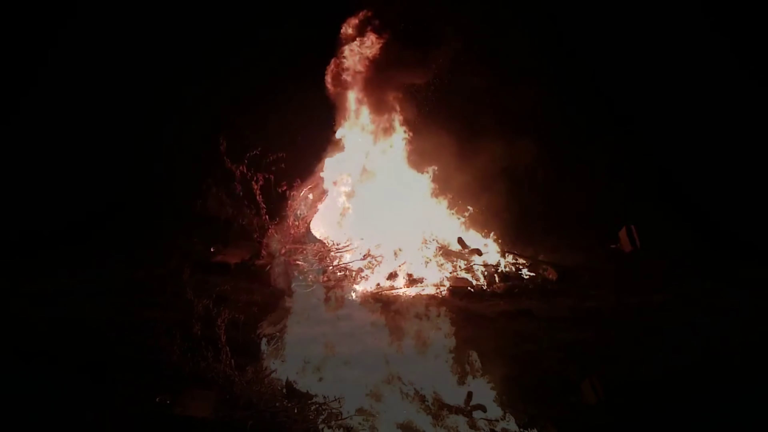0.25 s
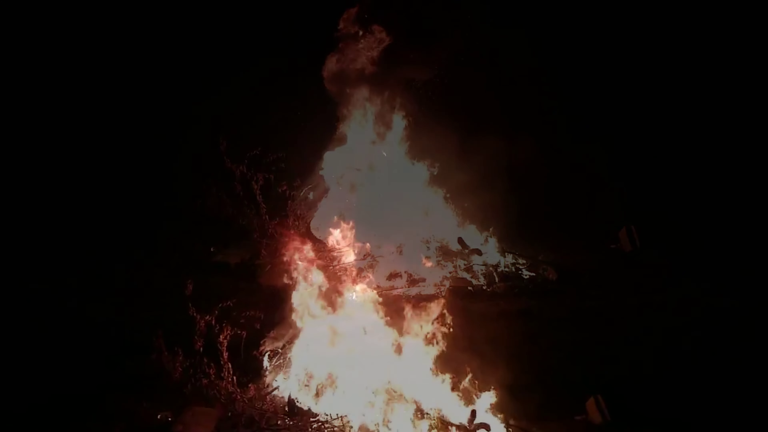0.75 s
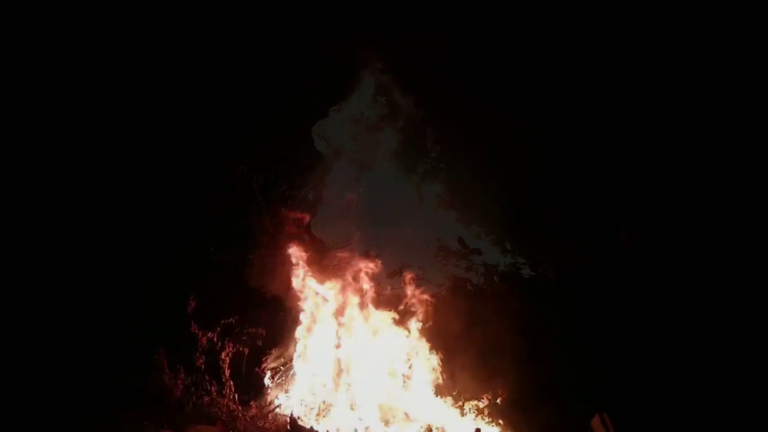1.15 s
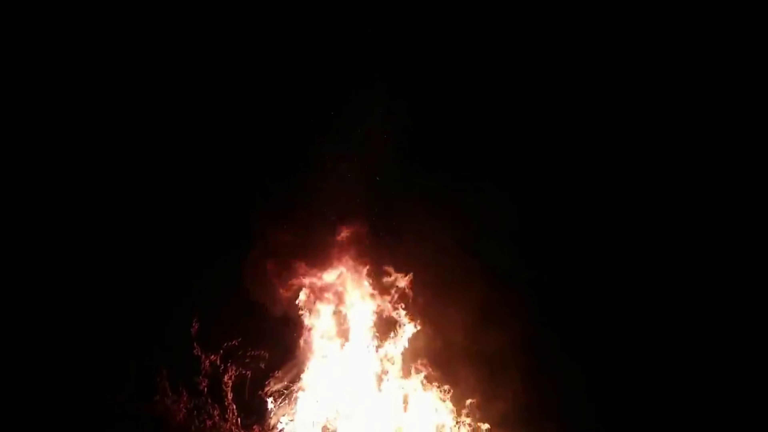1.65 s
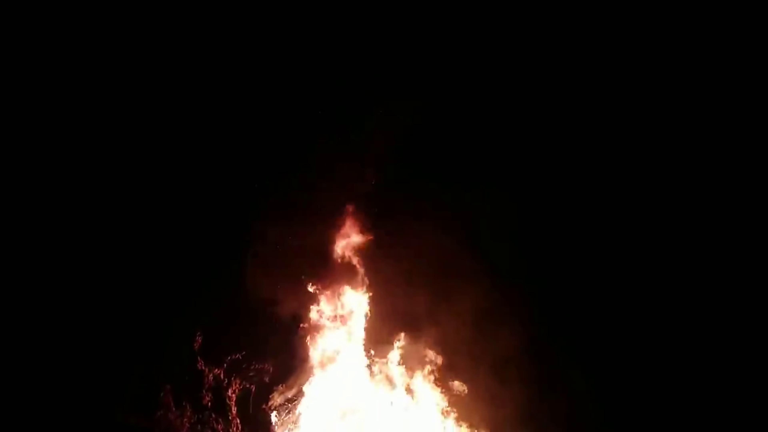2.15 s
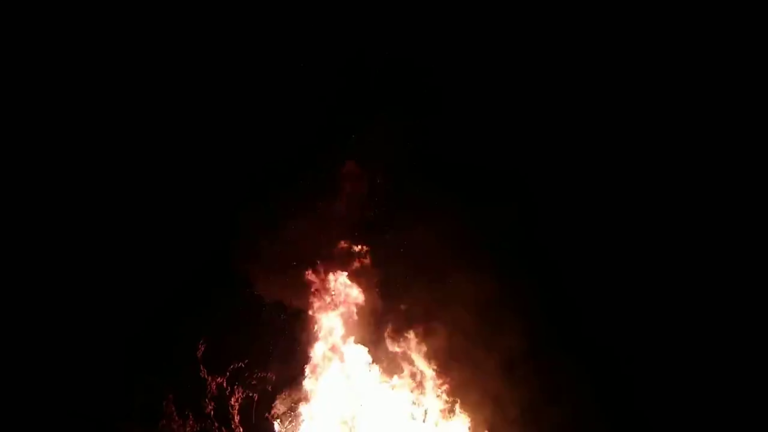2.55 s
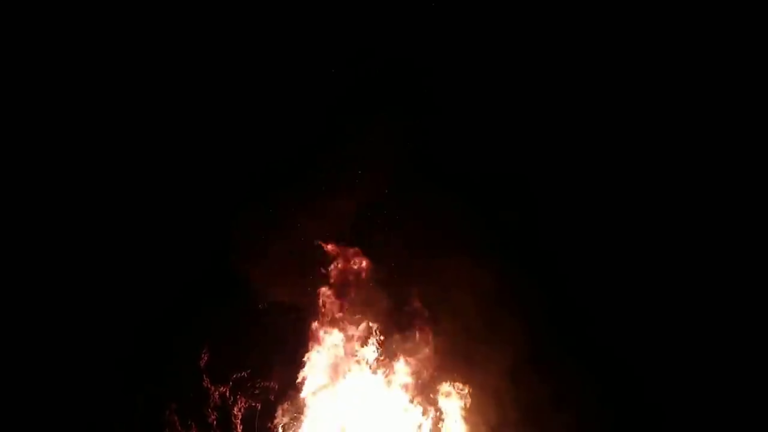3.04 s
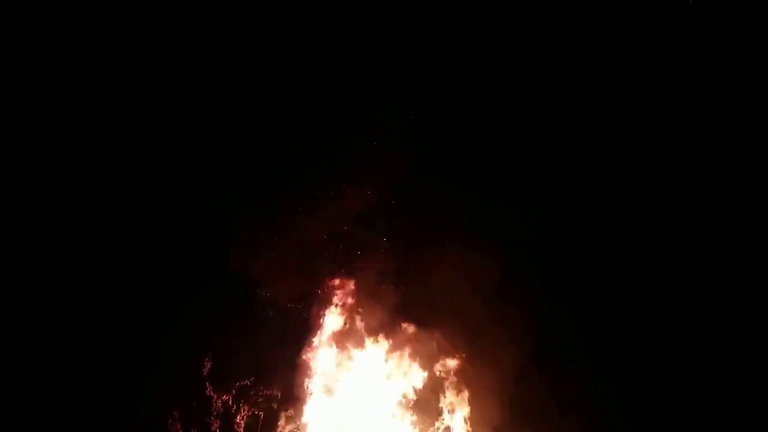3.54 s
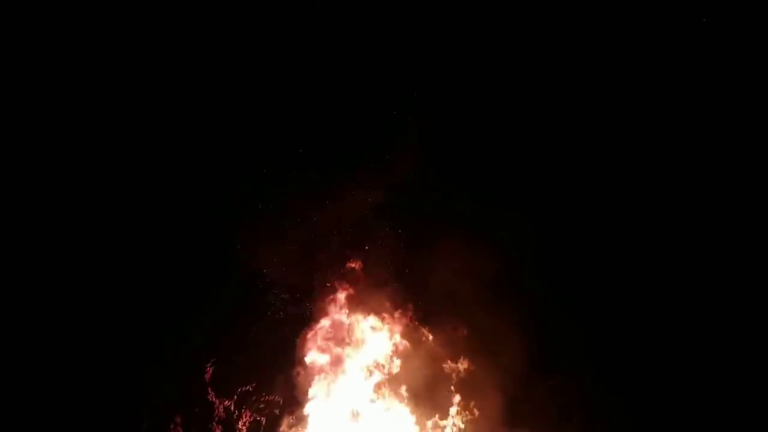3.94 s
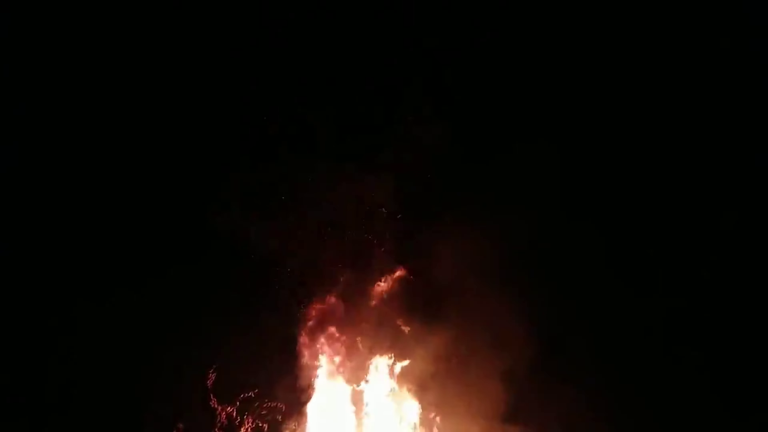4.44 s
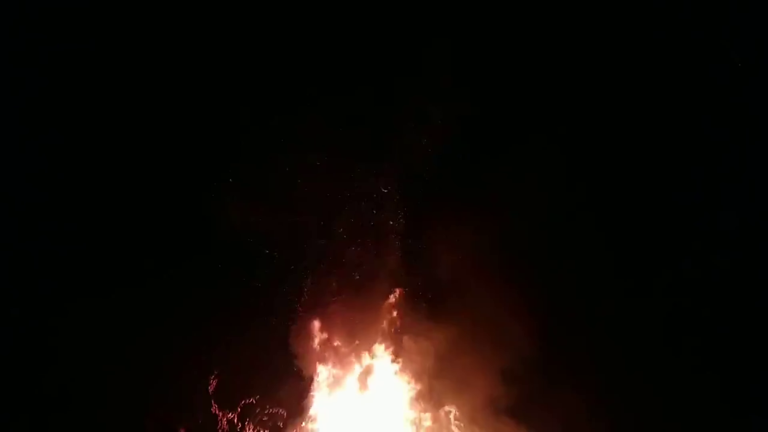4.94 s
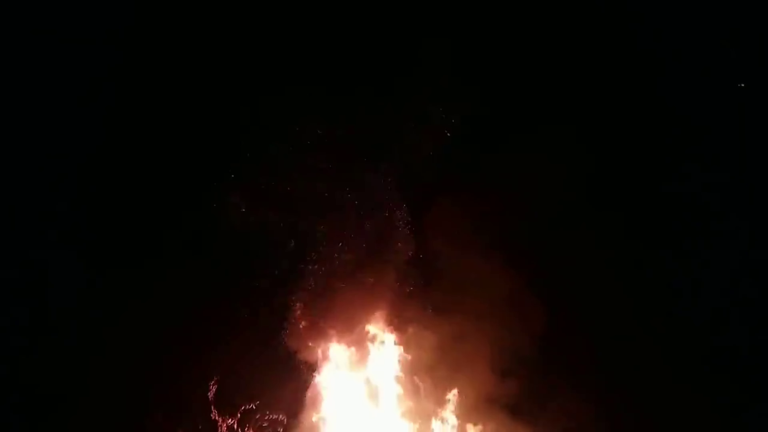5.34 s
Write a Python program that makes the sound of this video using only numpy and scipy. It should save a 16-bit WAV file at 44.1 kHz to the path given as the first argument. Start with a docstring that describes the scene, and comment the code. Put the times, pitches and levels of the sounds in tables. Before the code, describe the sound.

A bonfire of branches burns outdoors, heard as if in slow motion but at normal pitch. Sharp cracks come from the start, most repeating a few times in a quick stutter. Under them a low, fluttering roar and a ticking hiss of sap swell and then hold. The loudest cracks come in the second half, and the deep rumble sinks away near the end.

```python
"""A bonfire of branches at night in slow motion: replayed overlapping slices keep the pitch, make the
roar flutter and stutter most cracks a few times, some 60 ms apart. From the start, pockets of steam
split the wood in sharp cracks. Over the first two seconds the low roar of turbulent flames swells, and
so does the hiss and ticking of boiling sap. The loudest cracks come near 3.8 s and 4.5 s; after 5 s
the deep rumble sinks away."""
import sys
import numpy as np
from scipy.fft import rfft, irfft, next_fast_len
from scipy.io import wavfile
from scipy.ndimage import uniform_filter1d, map_coordinates

SR = 44100
rng = np.random.default_rng(int(sys.argv[2]) if len(sys.argv) > 2 else 0)


def inscribe(sig):
    """Save sig as 16-bit PCM at rate SR to the path in sys.argv[1].

    A 1-D sig is mono; a 2-D sig holds one channel per row.
    Samples are clipped to [-1, 1] before scaling.
    """
    pcm = np.round(np.clip(np.atleast_2d(sig).T, -1, 1) * 32767)
    wavfile.write(sys.argv[1], SR, pcm.astype(np.int16))


N = 246519

# start_s, soundings, first_sounding_db, thud_db, knock_db, snap_db, sizzle_db, splinter_factor
CRACKS = [(.116, 2, 0, -52, -48, -45, -47, 1.3), (0.1814, 2, 0.5, -36, -39, -60, -46, 0.9),
          (.2036, 3, 0, -52, -42, -45, -41, .9), (0.344, 2, 0, -37, -58, -41, -35.5, .5),
          (0.3668, 3, 0, -39, -40, -49, -46, 1.1), (0.4331, 2, 0.5, -33, -35, -32.5, -30, 0.7),
          (.751, 3, -2, -46, -41, -39, -40, 2.4), (0.762, 3, 0, -38, -41, -38, -47, 1.7),
          (0.847, 2, -2, -35, -44, -37, -36, 2.2), (0.963, 2, -1, -35, -42, -35, -36, 2),
          (0.9815, 3, 0, -42, -36, -36, -36, 1.6), (.9935, 4, 0, -46, -41, -38, -36, 2),
          (1.183, 1, 0, -42, -38, -35, -35, 2.2), (1.2455, 4, 0, -55, -50, -37, -36, 1.6),
          (1.3045, 4, 0, -45, -44, -42, -40, 1.6), (1.522, 3, 0, -44, -43, -44, -41, .8),
          (1.865, 2, 0, -48, -48, -46, -37, 1.3), (1.881, 4, 0, -46, -42, -32, -38, 1.5),
          (2.1205, 5, 0, -44, -33, -36, -35, 1), (2.168, 3, 0, -50, -40, -38, -39, 1.2),
          (2.666, 3, 0, -50, -46, -40, -36, .6), (2.7485, 1, 0, -39, -41, -39, -35, 1.2),
          (2.814, 3, 1, -47, -42, -37, -34, .9), (2.856, 2, 0, -37, -41, -40, -36, 1),
          (2.9492, 3, 0, -46, -41, -39, -36, 1.2), (3.147, 4, 1, -32.5, -28.5, -26.5, -30, 1.3),
          (3.2222, 3, 1, -50, -39, -30, -33, 0.69), (3.406, 1, 2.5, -52, -41, -33, -33.5, .8),
          (3.617, 4, 0, -55, -42, -43, -36, 1.2), (3.706, 5, 1, -51, -60, -35, -33.5, 0.9),
          (3.7929, 5, -3, -31.5, -20, -26, -24.5, 0.75), (4.009, 6, 0, -52, -42, -40, -35, 1.1),
          (4.3416, 3, 0, -36, -34, -48, -36, 0.9), (4.4135, 4, 0, -39, -39, -37, -36, 1.3),
          (4.4952, 4, -1, -42, -28, -29, -25, .7), (4.5059, 5, 1, -54, -37, -23, -21, 0.34),
          (4.5893, 5, -7, -18, -15, -32, -35, .5), (4.9656, 2, 2.5, -52, -48, -32, -23.5, 0.28),
          (5.082, 2, 1, -58, -41, -29.5, -22, 0.29), (5.13, 4, 1, -38.5, -31, -26.5, -31, 1.3),
          (5.12, 3, 0, -40, -39, -34, -38, 1.4), (5.3715, 3, 1, -61, -46, -34, -38.5, 0.94)]
# Push of air from a split, relative to the crackle colour: freq_hz, gain_db
AIR_PUSH = [(290, 3), (450, -4), (600, -4), (750, -6), (1050, -.5), (1400, -2), (2000, -9), (2900, -9.5),
            (4200, -4.5)]
# centre_hz, width_hz, left_db, right_db
BRANCH_MODES = [(1700, 300, -1, -10), (2250, 300, -14, 0), (2700, 300, -4, 1), (3300, 300, 0, -10),
                (4250, 350, 5, -8)]
GROUND_DELAY_S, GROUND_GAIN = 0.00142, 0.42


def cracks(gain_db, push_below_hz, size=1024, onset=128):
    """Pockets of steam split the wood: dull knocks from thick branches, bright snaps from twigs."""
    splinter = np.array(CRACKS)[:, -1, None, None]
    tear = burst(len(CRACKS), blow_s=0.00033, bounce_s=GROUND_DELAY_S, bounce=0.11, scatter=splinter,
                 t60_s=0.02 * splinter, lead=0.08, lead_s=0.0018, flat=0.85)
    tear = np.repeat(tear, [round(count) for _, count, *_ in CRACKS], axis=0)  # one copy per sounding
    # In the low range a split is one clean push that rings the branch.
    hz = np.fft.rfftfreq(size, 1 / SR)
    ring = np.array([peaks([(centre, width, db[side]) for centre, width, *db in BRANCH_MODES], hz)
                     for side in range(2)])
    push = causal(amp(along(AIR_PUSH, hz)) * ring) * np.exp(-2j * np.pi * hz * onset / SR)
    ground_bounce = GROUND_GAIN * np.exp(-2j * np.pi * hz * GROUND_DELAY_S)
    push = push * (1 + ground_bounce) / np.hypot(1, GROUND_GAIN)
    push_share = 0.92 * lowpass(hz, push_below_hz, 4)
    waves = irfft(np.sqrt(1 - push_share) * rfft(tear) + np.sqrt(push_share) * push)
    rows = stutters()
    return amp(gain_db) * placed(rows[:, 0] - onset / SR, tinted(waves, rows[:, 1:]))


def burst(count, blow_s, bounce_s, bounce, scatter, t60_s, lead, lead_s, flat, size=1024, onset=128):
    """Unit-energy cracks: a faint, brief rise of noise, a blow, ground bounce, scatter off the pile."""
    t = (np.arange(size) - onset) / SR
    blow = np.exp(-(t / blow_s) ** 2) + bounce * np.exp(-((t - bounce_s) / blow_s) ** 2)
    skirt = np.where(t > 0, scatter * amp(-60 * np.abs(t) / t60_s), lead * np.exp(-np.abs(t) / lead_s))
    spectrum = rfft(rng.standard_normal((count, 2, size)) * (blow + skirt))
    # So brief a blow spreads its energy evenly over the spectrum.
    power = np.abs(uniform_filter1d(np.abs(spectrum) ** 2, 21, axis=-1)) + 1e-9
    wave = irfft(spectrum / power ** (flat / 2))
    return wave / np.linalg.norm(wave, axis=-1, keepdims=True)


# thud_hz, knock_hz, snap_hz, sizzle_hz
BAND_CENTRES = [1200, 3300, 6500, 12000]


def tinted(waves, bands_db):
    """Each crack with its own strength of thud, knock, snap and sizzle."""
    log_hz = np.log(np.fft.rfftfreq(waves.shape[-1], 1 / SR) + 1)
    gain = amp([np.interp(log_hz, np.log(BAND_CENTRES), row) for row in bands_db])
    return irfft(rfft(waves) * gain[:, None])


# Slow-motion step back per slice, also the stutter gap: time_s, step_s
STEP_BACK = [(0, .049), (.116, .035), (.18, .052), (.205, .051), (.255, .045), (.3, .045), (.344, .054),
             (.37, .054), (.43, .039), (.75, .045), (.79, .07), (1, .0703), (1.05, .045), (1.07, .045),
             (1.11, .063), (1.18, .074), (1.246, .045), (1.29, .076), (1.31, .076), (1.367, .058),
             (1.44, .058), (1.52, .063), (1.585, .072), (1.865, .061), (1.88, .0635), (3.21, .0605),
             (3.27, .069), (3.7, .069), (3.79, .0627), (3.86, .0673), (3.92, .058), (3.98, .0636),
             (4.07, .061), (4.2, .061), (4.257, .067), (4.33, .063), (4.41, .063), (4.5, .0537),
             (4.55, .0665), (4.59, .0662), (4.62, .064), (4.66, .064), (4.69, .0605), (4.72, .0605),
             (4.78, .0587), (4.96, .067), (5.13, .067), (5.22, .057)]
SLICE_S = 0.078


def stutters():
    """Crack soundings, one step back apart: start_s, thud_db, knock_db, snap_db, sizzle_db."""
    rows = []
    for start_s, count, first_db, *bands_db, _ in CRACKS:
        for k in range(round(count)):
            rows.append((start_s, *(np.array(bands_db) + first_db * (k == 0))))
            start_s += np.interp(start_s, *np.transpose(STEP_BACK))
    return np.array(rows)


def slice_starts(jitter_s):
    """First sample of each slice: every one steps back over much of the last."""
    times = np.arange(0, N / SR, SLICE_S)
    back_s = np.interp(times, *np.transpose(STEP_BACK)) + jitter_s * rng.uniform(-1, 1, len(times))
    return (np.cumsum(np.clip(SLICE_S - back_s, 0, SLICE_S)) * SR).astype(int)


def slowed(x, starts, fade_s=0.012):
    """Slow motion at unchanged pitch: overlapping slices laid end to end, cross-faded at even power."""
    hop = int(np.ceil(SLICE_S * SR))
    index, offset = np.divmod(np.arange(N), hop)
    fade = np.pi / 2 * np.minimum(offset / min(fade_s * SR, hop), 1)
    incoming = x[:, (starts[index] + offset) % N]
    outgoing = x[:, (starts[index - 1] + hop + offset) % N]
    return np.sin(fade) * incoming + np.cos(fade) * outgoing


# freq_hz, left_db, right_db
CRACKLE_COLOUR = [(250, -40, -48.5), (450, -26.5, -18), (722, -11, -6.5), (1040, -22.5, -15),
                  (1854, -16.5, -8.5), (2003, -28, 5), (2143, -1, -0.5), (2680, -39, -3), (3280, -6, -11),
                  (4185, -13.5, -2), (4130, -4.5, -16.5), (5600, -12.5, -4.5), (6850, -8, -7),
                  (8780, -17.5, -14), (10630, -10.5, -6.5), (16400, -10.5, -9.5)]
TOP_HZ = 15700


def crackle_colour(hz, blur_hz=0):
    """Left and right tone colour shared by cracks and hiss, at mean power 1; blur shortens its ring."""
    power = amp([along(CRACKLE_COLOUR, hz, column=1), along(CRACKLE_COLOUR, hz, column=2)]) ** 2
    power = np.abs(uniform_filter1d(power, int(blur_hz / hz[1]) + 1, axis=-1))
    gain = np.sqrt(power / np.mean(power[:, hz < TOP_HZ]))
    shared = gain.mean(axis=0)
    return causal(shared) * gain / shared * left_later(hz)


# freq_hz, density_db
FLAME_SPECTRUM = [(13, -50), (25, -15), (50, -6), (66, -2), (85, -4.5), (115, -6), (145, -2), (195, -6.5),
                  (232, -4.5), (265, -10), (330, -13), (400, -20), (520, -24), (680, -28), (1140, -120)]
# time_s, relative_level_db
RUMBLE_LEVEL = [(0, -61.5), (.06, -62), (.6, -54.5), (.95, -58), (1.25, -50), (1.5, -53.5), (1.85, -51),
                (2.45, -54), (2.75, -50.5), (3.05, -52), (3.25, -49.5), (3.9, -51), (4.17, -46.5),
                (4.55, -53), (5.1, -52), (5.35, -60), (5.59, -61)]
# time_s, relative_level_db
RUSH_LEVEL = [(0, -63.5), (.33, -57.5), (.48, -60.5), (.93, -54), (1.2, -54.5), (1.75, -51), (2.03, -49.5),
              (2.22, -53), (2.55, -48.5), (2.8, -52), (3.08, -53), (3.38, -51), (4.0, -52), (4.25, -49.5),
              (4.58, -55), (4.85, -50), (5.06, -54.5), (5.59, -52)]
# Rush above its edge against rush below: time_s, tilt_db
RUSH_TILT = [(0, -3), (1.3, -2), (2.0, 5), (2.6, 3.5), (3.2, 3), (3.7, -5.5), (4.4, -0.5), (5.59, 1.5)]


def flames(starts, rumble_gain_db, rush_gain_db, rush_edge_hz):
    """Turbulent flames: a deep rumble under a low rush, nearly alike on both sides, stronger right."""
    def colour(hz):
        lean_db = along([(30, 1.4), (125, 2.7), (260, 3.4), (500, 8.5)], hz) / 2
        return amp(along(FLAME_SPECTRUM, hz) + np.array([-lean_db, lean_db])) * left_later(hz)

    noise = rng.standard_normal((2, N))
    air = paired(noise, correlation=[(60, 0.98), (130, 0.94), (260, 0.94), (500, 0.76)])
    air = filtered(air, colour)
    deep = filtered(air, lambda hz: lowpass(hz, 100, 8))
    rumble = steady(slowed(deep, starts, fade_s=0.038), span_s=0.06)
    rush = slowed(air - deep, starts, fade_s=0.028)
    low = filtered(rush, lambda hz: lowpass(hz, rush_edge_hz, 8))
    rush = steady(low + amp(curve(RUSH_TILT)) * (rush - low), span_s=0.07)
    rumble *= amp(curve(RUMBLE_LEVEL) + rumble_gain_db)
    rush *= amp(curve(RUSH_LEVEL) + rush_gain_db)
    return rumble + rush


# time_s, relative_level_db
STEAM_LEVEL = [(0.0, -58), (0.12, -57.5), (0.42, -54.5), (0.79, -53), (1.07, -50.5), (1.8, -49.5),
               (2.12, -47), (2.51, -48.5), (2.86, -46.5), (4.44, -47), (4.67, -48), (4.81, -47.5),
               (5.23, -50), (5.59, -50)]
# centre_s, half_length_s, treble_gain_db
STEAM_JETS = [(0.598, 0.16, 0.5), (2.122, 0.13, 2.5), (2.85, 0.13, 0.5), (3.96, 0.095, 1.5),
              (4.777, 0.14, 1.5)]
# centre_hz, width_hz, strength_db
HISS_MODES = [(891, 37, -2), (1270, 1030, 0), (1956, 17, -2.5), (2383, 107, 3), (3959, 4.3, 1)]
# freq_hz, left_right_correlation
HISS_CORRELATION = [(450, 1), (900, 0.57), (1500, .3), (2100, .4), (2800, 0.092), (3800, 0.21),
                    (6000, 0.067), (9000, 0.45), (11000, 0.066), (15000, 0.062)]


def hiss(starts, body_gain_db, treble_gain_db, spit_db, spurt_db):
    """Steam leaves the wood with ticks and spits; jets and short random spurts brighten it."""
    ticking = amp(flurries()) * ticks(starts)
    steam = unit(slowed(paired(rng.standard_normal((2, N)), HISS_CORRELATION), starts))
    mix = steady(steam + ticking + amp(spit_db) * spits(starts), span_s=0.42)
    body = filtered(mix, lambda hz: lowpass(hz, 3100, 6))
    spurts = amp(spurt_db * wobble(rate_hz=110.95))
    spurts = steady(slowed(spurts[None], starts), span_s=0.066)
    t = np.arange(N) / SR
    jets_db = sum(db * np.exp(-((t - centre_s) / half_s) ** 2) for centre_s, half_s, db in STEAM_JETS)
    treble = amp(treble_gain_db + jets_db) * spurts * (mix - body)
    sizzle = amp(curve(STEAM_LEVEL)) * (amp(body_gain_db) * body + treble)
    return filtered(sizzle, lambda hz: peaks(HISS_MODES, hz))


def ticks(starts, count=800, spread_db=4, colour_db=0.5):
    """Tiny cells burst in the wood: dense ticks of uneven size."""
    times = rng.uniform(0, starts[-1] / SR + SLICE_S, count)
    size_db = spread_db * np.minimum(rng.exponential(size=(count, 1)), 3)
    waves = burst(count, blow_s=0.0005, bounce_s=0.0016, bounce=0.42, scatter=0.24,
                  t60_s=0.019, lead=0.42, lead_s=0.0012, flat=0.35)
    bands_db = size_db + colour_db * rng.standard_normal((count, len(BAND_CENTRES)))
    ticking = placed(times, tinted(waves, bands_db))
    return unit(slowed(paired(ticking, HISS_CORRELATION), starts))


def flurries(calm_db=-3.5, rise_db=4, reach_s=0.093, range_db=15):
    """Tick level over the smooth steam in dB: it rises around loud cracks, most at the loudest."""
    rows = stutters()
    t = np.linspace(0, N / SR, num=400)
    loud_db = rows[:, 1:].max(axis=1)
    stir = np.maximum(1 + (loud_db - loud_db.max()) / range_db, 0)
    nearby = np.max(stir * np.exp(-((t[:, None] - rows[:, 0]) / reach_s) ** 2), axis=1)
    return calm_db + rise_db * np.interp(np.arange(N) / SR, t, nearby)


def spits(starts, count=130, centre_hz=7300, spread_octaves=0.95, width_octaves=0.35, spread_db=4):
    """Beads of sap boil off the bark: sparse gritty spits of a few ms, each with its own pitch."""
    times = rng.uniform(0, starts[-1] / SR + SLICE_S, count)
    pitch, strength = rng.uniform(-1, 1, (count, 2)).T[..., None, None]
    waves = burst(count, blow_s=0.0005, bounce_s=GROUND_DELAY_S, bounce=0.5, scatter=0.8,
                  t60_s=0.018, lead=0.3, lead_s=0.001, flat=0.35)
    hz = np.fft.rfftfreq(waves.shape[-1], 1 / SR)
    octaves = np.log2((hz + 1) / centre_hz) - spread_octaves * pitch
    gain = amp(spread_db * strength) / np.hypot(1, octaves / width_octaves)
    grit = placed(times, irfft(rfft(waves) * gain))
    return steady(slowed(grit, starts), span_s=0.6)


def left_later(hz, lag_s=0.00012):
    """Sound from the fire reaches the right side first."""
    return np.exp(-2j * np.pi * hz * np.array([[lag_s / 2], [-lag_s / 2]]))


def paired(x, correlation):
    """Two unrelated signals blended to a left-right correlation that varies with frequency."""
    def blend(hz):
        angle = np.arccos(np.clip(along(correlation, hz), -1, 1)) / 2
        return np.array([np.cos(angle), np.sin(angle)])

    mid, side = filtered(x, blend)
    return np.array([mid + side, mid - side])


def placed(times, waves):
    """Stereo waves summed at their times."""
    at = (np.maximum(times, 0) * SR).astype(int)[:, None] + np.arange(waves.shape[-1])
    return np.array([np.bincount(at.ravel(), waves[:, side].ravel(), N)[:N] for side in range(2)])


def filtered(x, response):
    """x through a frequency response."""
    size = 2 * next_fast_len(N // 2 + SR // 4)
    return irfft(rfft(x, size) * response(np.fft.rfftfreq(size, 1 / SR)), size)[..., :N]


def lowpass(hz, edge_hz, steepness):
    """Gain that falls to one half at the edge."""
    return 1 / (1 + (hz / edge_hz) ** steepness)


def peaks(modes, hz):
    """Gain of 1 raised by resonances."""
    return 1 + sum(amp(db) / (1 + ((hz - centre) / width * 2) ** 2) for centre, width, db in modes)


def causal(gain):
    """Minimum-phase response with this gain: it rings only after a blow."""
    cepstrum = irfft(np.log(np.maximum(gain, 1e-6)))
    half = cepstrum.shape[-1] // 2
    cepstrum[..., 1:half] *= 2
    cepstrum[..., half + 1:] = 0
    return np.exp(rfft(cepstrum))


def along(table, hz, column=1):
    """One column of a frequency table, read on a log axis."""
    columns = np.transpose(table)
    return np.interp(np.log(hz + 1), np.log(columns[0] + 1), columns[column])


def curve(table):
    """A time table read at every sample."""
    return np.interp(np.arange(N) / SR, *np.transpose(table))


def wobble(rate_hz):
    """A smooth curve through random knots."""
    knots = rng.standard_normal(int(N * rate_hz / SR) + 4)
    return map_coordinates(knots, [np.arange(N) * rate_hz / SR])


def steady(x, span_s):
    """x held at rms 1 over each span."""
    power = uniform_filter1d(np.mean(x ** 2, axis=0), max(int(span_s * SR), 2))
    return x / np.sqrt(np.abs(power) + 1e-12)


def unit(x):
    """x at rms 1."""
    return x / np.sqrt(np.mean(x ** 2) + 1e-20)


def amp(db):
    """Decibels to gain."""
    return 10 ** (np.asarray(db) / 20)


def scene():
    """Roar and hiss share the same slices; the cracks stand out over them."""
    starts = slice_starts(jitter_s=0.014)
    sap = hiss(starts, body_gain_db=3.5, treble_gain_db=4, spit_db=-6.5, spurt_db=1.55)
    sap = filtered(sap, crackle_colour)
    wood = cracks(gain_db=22, push_below_hz=5000)
    wood = filtered(wood, lambda hz: crackle_colour(hz, blur_hz=406))
    roar = flames(starts, rumble_gain_db=-1.5, rush_gain_db=0.5, rush_edge_hz=140)
    return wood + roar + sap


def record(dry):
    """A steep band limit cuts the highest treble."""
    return filtered(dry, lambda hz: lowpass(hz, TOP_HZ, 160))


dry = scene()
out = record(dry)
inscribe(out)
```